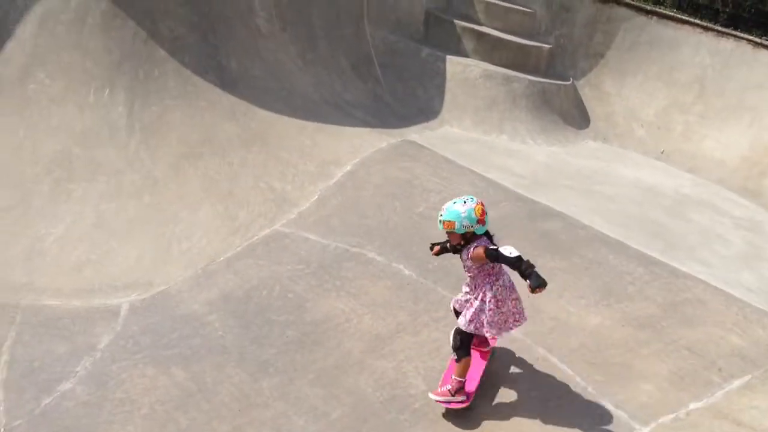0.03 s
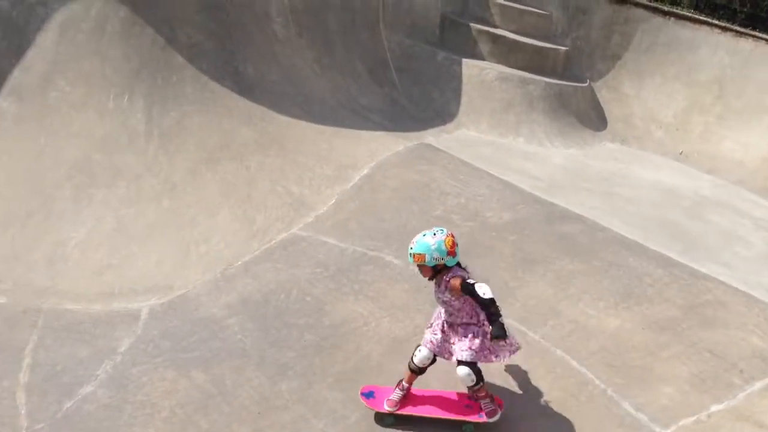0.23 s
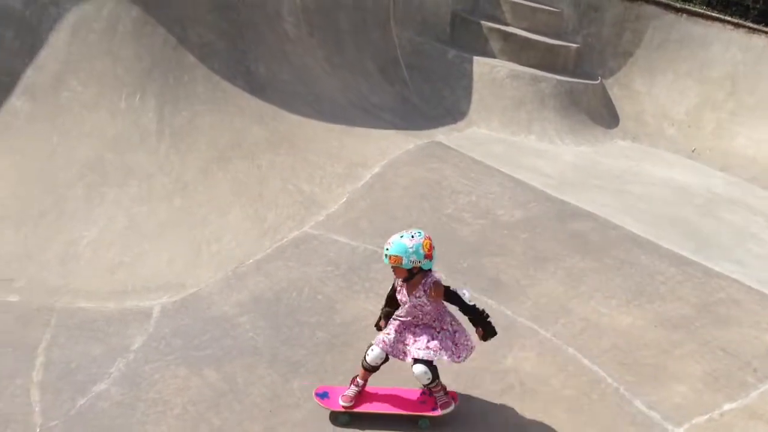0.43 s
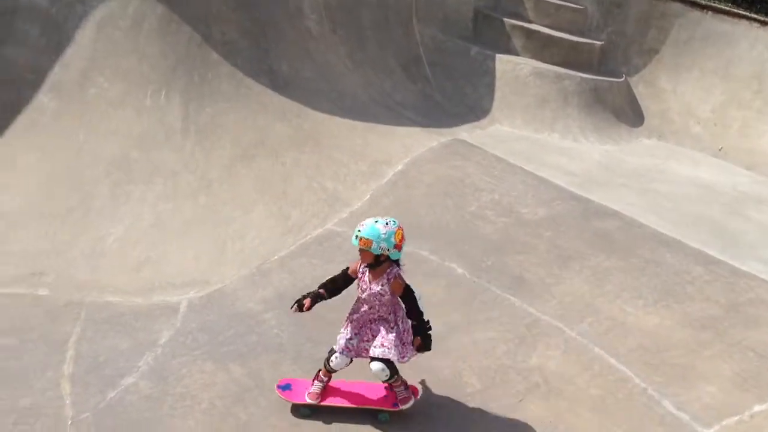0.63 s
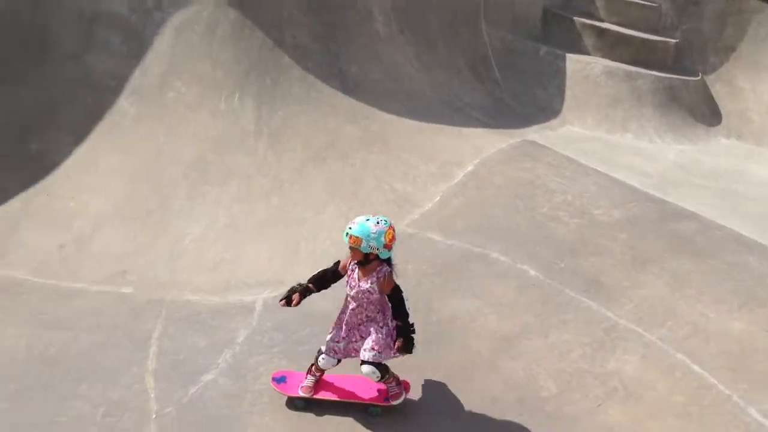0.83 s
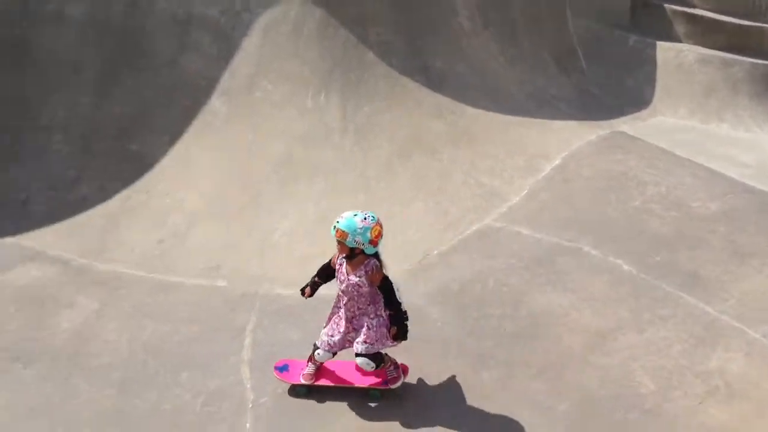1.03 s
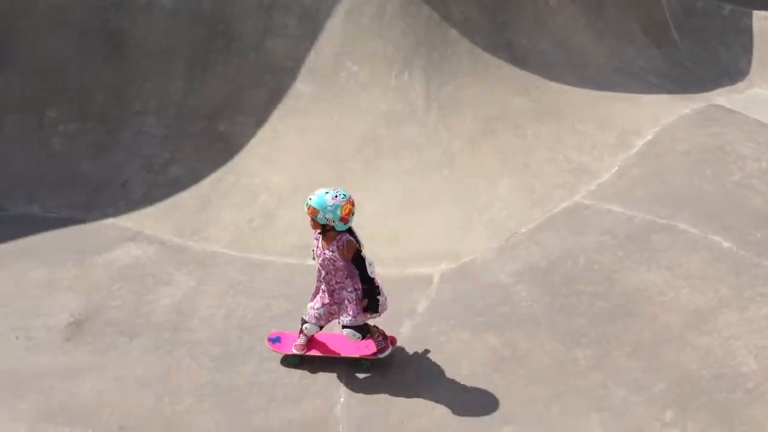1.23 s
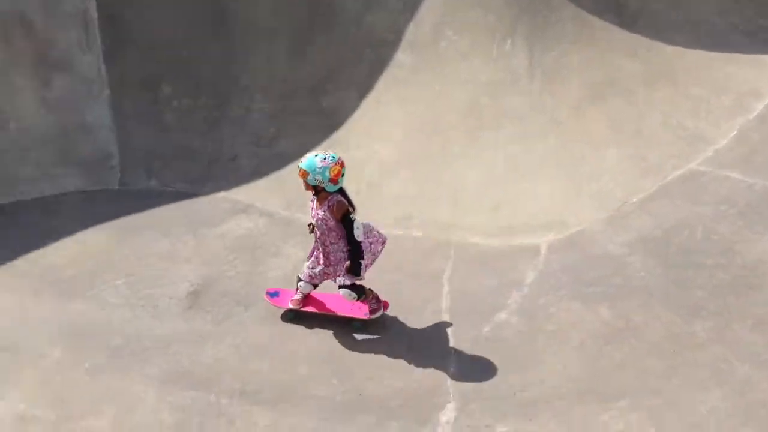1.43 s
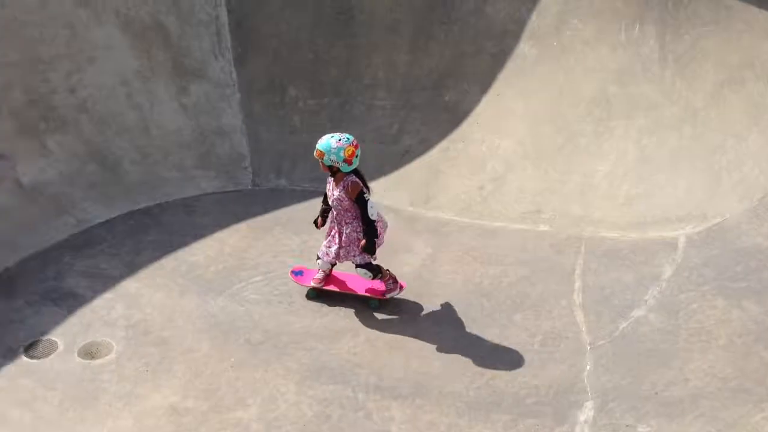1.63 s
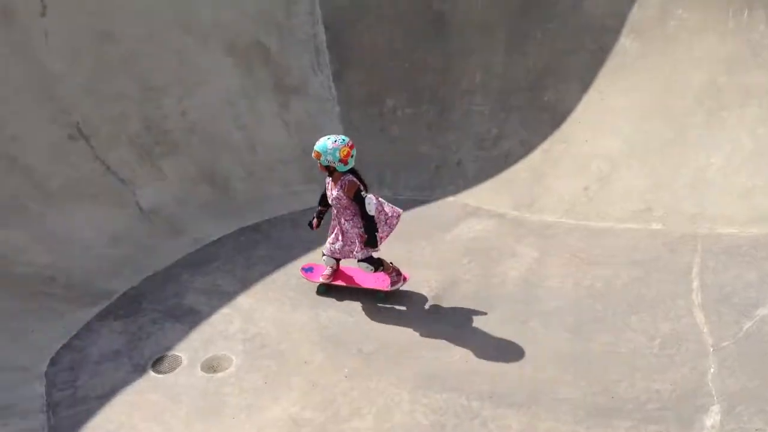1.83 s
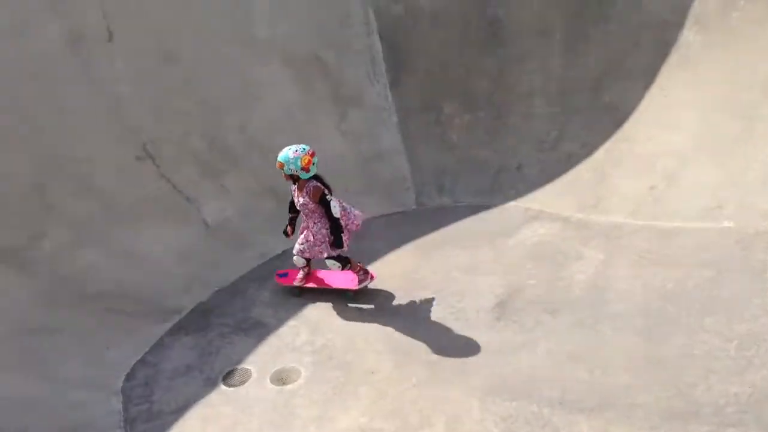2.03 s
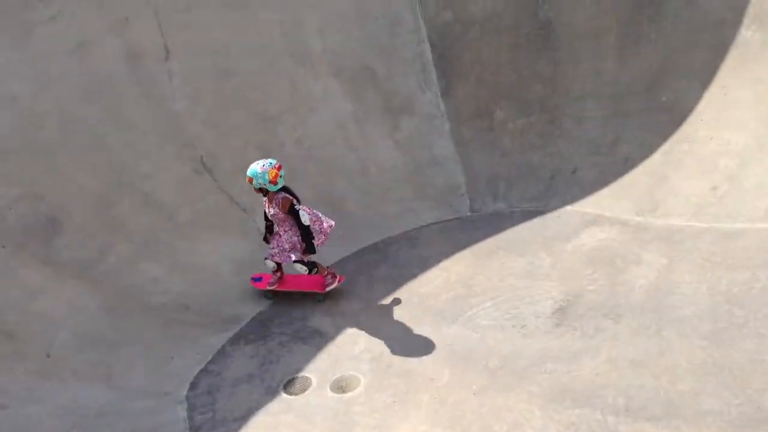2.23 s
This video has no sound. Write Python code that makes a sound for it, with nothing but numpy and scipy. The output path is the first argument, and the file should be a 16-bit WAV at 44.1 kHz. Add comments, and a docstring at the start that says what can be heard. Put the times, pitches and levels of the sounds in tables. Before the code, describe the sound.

Skateboard wheels slap down, skid with a short squawk, then roll on concrete with small ticks.

```python
"""Skateboard in a concrete bowl

One microphone close by, in quiet outdoor air. Out of a kick turn the front wheels slap down one after the
other and skid sideways, the urethane juddering in a short, falling squawk. The board rolls on with small
ticks, its deck drumming on rougher concrete, and both axles knock over a seam. The bowl answers briefly."""
import sys
import numpy as np
from scipy import signal
from scipy.fft import rfft, irfft, next_fast_len
from scipy.io import wavfile
from scipy.ndimage import map_coordinates

SR = 44100
rng = np.random.default_rng(int(sys.argv[2]) if len(sys.argv) > 2 else 0)


def transcribe(signal):
    """Save signal, clipped to [-1, 1], as a 16-bit WAV file at the path in sys.argv[1]."""
    frames = np.atleast_2d(signal).T
    limited = np.clip(frames, -1, 1)
    pcm = np.round(limited * 32767).astype(np.int16)
    wavfile.write(sys.argv[1], SR, pcm)


N = 101429


def amp(db):
    """Decibels to gain."""
    return 10 ** (np.asarray(db) / 20)


def unit(x):
    """Scale to rms 1."""
    return x / np.sqrt(np.mean(x ** 2) + 1e-20)


def along(points, hz):
    """Read (f/Hz, value) points along a log frequency axis."""
    f, values = np.transpose(points)
    return np.interp(np.log(hz + 1), np.log(f + 1), values)


def curves(rows):
    """One value per sample for each column after the time."""
    times, *columns = np.transpose(rows)
    return [np.interp(np.arange(N) / SR, times, column) for column in columns]


def wobble(rate):
    """A smooth random curve, rate knots a second."""
    return map_coordinates(rng.standard_normal(N // 8), [np.arange(N) * rate / SR], mode="wrap")


def filtered(x, response):
    """x through a frequency response scaled to unit power gain."""
    size = 2 * next_fast_len(N)
    gain = response(np.fft.rfftfreq(size, 1 / SR))
    return irfft(rfft(x, size) * gain / np.sqrt(np.mean(abs(gain) ** 2)), size)[:N]


def coloured(x, points):
    """x through a causal filter with the given spectral shape."""
    def response(hz):
        cepstrum = irfft(np.log(amp(along(points, hz))))
        half = len(cepstrum) // 2
        return np.exp(rfft(np.r_[cepstrum[0], 2 * cepstrum[1:half], np.zeros(half)]))
    return filtered(x, response)


def rung(x, modes):
    """x through a set of resonances of alternating sign."""
    def response(f):
        return sum((-1) ** k * amp(db) * 1j * f * width / (centre ** 2 - f ** 2 + 1j * f * width)
                   for k, (centre, width, db) in enumerate(modes))
    return filtered(x, response)


def grit(rate, spread_db):
    """Tiny impacts of uneven size, rate a second, at rms 1."""
    impacts = (rng.random(N) < rate / SR) * rng.choice([-1, 1], N)
    return unit(impacts * amp(spread_db * rng.standard_normal(N)))


def blows(rows, attack_s):
    """Crunching contacts: bursts of noise that rise quickly and die away."""
    power = np.zeros(N)
    for start, db, t60 in rows:
        age = np.maximum(np.arange(N) / SR - start, 0)
        rise = np.minimum(age / attack_s, 1)
        power += (rise * amp(db - 60 * np.maximum(age - attack_s, 0) / t60)) ** 2
    return np.sqrt(power) * rng.choice([-1, 1], N)


def pivot():
    """The rear wheels scrub faintly through the kick turn, before the nose comes down."""
    # strength of the scrub: t/s, level/dB
    scrub = [(0, -55), (.15, -53), (.23, -46.5), (.26, -100)]
    # its resonances: f/Hz, width/Hz, level/dB
    modes = [(350, 83, 6), (1190, 540, 1.5)]
    level_db, = curves(scrub)
    return rung(amp(level_db) * rng.standard_normal(N), modes)


def drifting(x, depth=0.016):
    """The resonances in x slide a little up and down as the load on the wheels shifts."""
    slide = depth * wobble(rate=9)
    return unit(map_coordinates(x, [np.cumsum(1 + slide - slide.mean())], mode="reflect"))


def rolling():
    """The grain of the concrete rings the wheels and hisses under them."""
    # the roll at the microphone: t/s, ring level/dB, hiss level/dB
    levels = [(0, -66.5, -70), (.17, -51.5, -68), (.47, -58.5, -63), (.62, -52.5, -59), (.76, -53, -65),
              (.9, -50.5, -60.5), (1.27, -47.5, -57), (1.6, -50, -55.5), (2.3, -48, -54.5)]
    # wheel resonances: f/Hz, width/Hz, level/dB
    wheel_modes = [(391.6, 65, 7.5), (595, 26, 10.5), (848, 264, 4), (1690, 326, 2.5), (2157, 78, 6.5),
                   (2606, 210, -2.5), (3210, 160, -4.5), (4146, 215, -7)]
    # hiss spectrum: f/Hz, level/dB
    hiss_colour = [(1500, -7.5), (3200, 3.5), (5100, 4.5), (6250, -8), (7400, -1), (9500, -8), (15000, -14)]
    ring_db, hiss_db = curves(levels)
    surface_db = 0.9 * wobble(rate=90)
    ring = amp(ring_db + surface_db) * drifting(rung(grit(rate=5000, spread_db=1.5), wheel_modes))
    hiss = coloured(amp(hiss_db + surface_db) * grit(rate=10000, spread_db=3.5), hiss_colour)
    return ring + hiss


def deck(low_hz=115):
    """Rough concrete sets the wooden deck drumming; it is too small to radiate deep bass."""
    # shaking of the deck: t/s, level/dB
    shaking = [(.2, -56.5), (.27, -39.5), (.4, -47.5), (.45, -62), (1.29, -51.5), (1.36, -40.5),
               (1.47, -38), (1.55, -43.5), (1.65, -41.5), (1.89, -45), (2.3, -42.5)]
    # deck resonances: f/Hz, width/Hz, level/dB
    modes = [(160.6, 46.3, -1), (182.3, 34, 1.5), (224.7, 26, -6), (595.6, 28, -12.5)]
    shake_db, = curves(shaking)
    drumming = rung(amp(shake_db) * rng.standard_normal(N), modes)
    return signal.sosfilt(signal.butter(3, low_hz, "high", fs=SR, output="sos"), drumming)


def slaps():
    """The front wheels slap onto the concrete one after the other."""
    # landings: t/s, level/dB, t60/s
    landings = [(.2331, -10, .025), (.237, -2, .026), (.2536, -4, .035)]
    # slap spectrum: f/Hz, level/dB
    colour = [(70, -42), (230, -23), (350, -6.5), (480, -15.5), (660, -1.5), (1170, -1.5), (1380, -12.5),
              (2000, -4.5), (2400, -11), (4900, -12), (5500, -17), (15000, -28)]
    return coloured(blows(landings, attack_s=0.00098), colour)


def skid(jitter=0.018, slip_depth=0.25, truck_db=-3):
    """Urethane sticks and slips: a fluttering buzz, and a scrape at each slip that rings the truck."""
    # stick-slip rate: t/s, f/Hz
    judder = [(.26, 424.5), (.318, 404.8), (.345, 386.8), (.368, 398.6), (.39, 386)]
    # course of the skid: t/s, fundamental level/dB, overtone level/dB, scrape level/dB
    levels = [(.249, -55, -60, -13.5), (.27, -24.5, -33, -16.5), (.295, -19, -24, -15.5),
              (.32, -17, -17.5, -19), (.345, -17.5, -21.5, -21.5), (.368, -30.5, -18, -27),
              (.388, -55, -37.5, -29.5), (.408, -62, -40, -52)]
    # balance of the first four harmonics: level/dB
    harmonics = [-2.5, -1.5, -18, -9]
    # scrape spectrum: f/Hz, level/dB
    scrape_colour = [(150, -49), (480, -17.5), (750, -6.5), (1400, -6), (2000, -4), (5000, -10.5),
                     (6000, -18), (8200, -16), (9500, -22.5), (15000, -25)]
    # truck resonances: f/Hz, width/Hz, level/dB
    truck_modes = [(1230, 43, -3), (1590, 58, -0.5), (2176, 27, 6), (2950, 67, -1.5), (3906, 47, 2),
                   (4780, 59, -9.5)]
    hz, = curves(judder)
    tone_db, overtone_db, scrape_db = curves(levels)
    t = np.arange(N) / SR
    sliding = (t > levels[0][0]) & (t < levels[-1][0])
    phase = 2 * np.pi * np.cumsum(hz * (1 + jitter * wobble(rate=400))) / SR
    buzz = np.zeros(N)
    for k, db in enumerate(harmonics):
        flutter_db = 0.65 * (k + 1) * wobble(rate=130)
        phase_shift = 0.42 * np.sqrt(k) * wobble(rate=110) + 2 * np.pi * rng.random()
        gain = amp(db + (overtone_db if k else tone_db) + flutter_db)
        buzz += gain * np.sin((k + 1) * phase + phase_shift)
    slips = unit(grit(rate=20000, spread_db=3) * (1 + slip_depth * np.cos(phase)) ** 2) * sliding
    scrape = coloured(amp(scrape_db) * slips, scrape_colour)
    truck = rung(amp(tone_db + truck_db) * slips, truck_modes)
    return np.sqrt(2) * buzz * sliding + scrape + truck


def ticks(t60_s=0.049):
    """The wheels tick over grit and small seams."""
    # ticks: t/s, level/dB
    hits = [(0.587, -40), (0.661, -39.5), (.682, -45), (0.8529, -38.5), (.987, -39.5), (1.134, -37.5),
            (1.232, -48), (1.293, -43), (1.963, -35.5), (2.291, -41.5)]
    # tick spectrum: f/Hz, level/dB
    colour = [(150, -5), (900, 10.5), (1250, 3.5), (1700, 7), (4500, -2.5), (6200, -9), (7600, -5),
              (15000, -22.5)]
    return coloured(blows([(start, db, t60_s) for start, db in hits], attack_s=0.0015), colour)


def clonks():
    """One push for each bump rings the board hollowly; a longer contact sounds softer."""
    # a small bump, then each axle landing beyond the seam: t/s, level/dB, half contact time/s
    bumps = [(1.727, -10, .0003), (2.0258, -3, .0001), (2.1578, -1.5, .0001)]
    # board resonances: f/Hz, width/Hz, level/dB
    modes = [(181, 36, -6), (594, 24, -0.5), (1084, 120, -11.5)]
    t = np.arange(N) / SR
    push = sum(amp(db) * np.exp(-((t - centre) / half) ** 2) / (np.sqrt(np.pi) * half * SR)
               for centre, db, half in bumps)
    return rung(push, modes)


def clinks():
    """Loose steel in the truck clinks at the seam."""
    # steel contacts: t/s, level/dB, t60/s
    hits = [(2.0093, -26, 0.042), (2.0132, -22, 0.008), (2.0255, -25.5, .012)]
    # clink spectrum: f/Hz, level/dB
    colour = [(2300, -15.5), (3300, -14.5), (5300, -7), (6300, -21.5), (7600, -3.5), (9500, -18.5),
              (12200, -13.5), (15000, -24)]
    return coloured(blows(hits, attack_s=0.00045), colour)


def knocks():
    """The wheels knock over the seam, one axle after the other."""
    # wheel strikes: t/s, level/dB, t60/s
    hits = [(2.0225, -23, 0.044), (2.0255, -24, 0.055), (2.040, -31, 0.065), (2.1455, -32, 0.078),
            (2.1515, -30.5, 0.056), (2.1568, -25.5, 0.012)]
    # knock spectrum: f/Hz, level/dB
    colour = [(60, -13), (180, -13), (590, -1.5), (1420, -10), (2100, -5.5), (3500, -17), (5200, -14),
              (6380, -30), (7400, -20.5), (15000, -34)]
    return coloured(blows(hits, attack_s=0.0003), colour)


def bowl(x, delay_s=0.02):
    """Curved concrete walls a few metres off return a short tail, the treble dying first."""
    # decay of the bowl: f/Hz, t60/s
    decay = [(200, 0.22), (1000, 0.3), (10000, 0.089)]
    hz, t, noise = signal.stft(rng.standard_normal(SR // 2), SR, nperseg=256)
    fade = amp(-60 * t / along(decay, hz)[:, None])
    tail = signal.istft(noise * fade, SR, nperseg=256)[1]
    delayed = np.pad(x, (int(delay_s * SR), 0))
    return signal.fftconvolve(delayed, tail / np.linalg.norm(tail))[:N]


def scene(bowl_db=-25, air_db=-58.5):
    """The board up close, its echo well behind it and the quiet outdoor air, in mono."""
    # spectrum of the air: f/Hz, level/dB
    air_colour = [(40, -5.5), (190, 11.5), (900, -13.5), (15000, -17)]
    board = pivot() + skid() + rolling() + deck() + slaps() + ticks() + clinks() + knocks() + clonks()
    air = amp(air_db) * coloured(rng.standard_normal(N), air_colour)
    return (board + amp(bowl_db) * bowl(board) + air)[None]


def record(dry, low_hz=75, top_hz=15450):
    """The microphone rounds off the loudest peaks, thins the deep bass and keeps nothing above top_hz."""
    rounded = dry / (1 + abs(dry) ** 6) ** (1 / 6)
    thinned = signal.sosfilt(signal.butter(2, low_hz, "high", fs=SR, output="sos"), rounded)
    size = 2 * next_fast_len(N)
    in_band = np.fft.rfftfreq(size, 1 / SR) < top_hz
    return irfft(rfft(thinned, size) * in_band, size)[:, :N]


dry = scene()
out = record(dry)
transcribe(out)
```